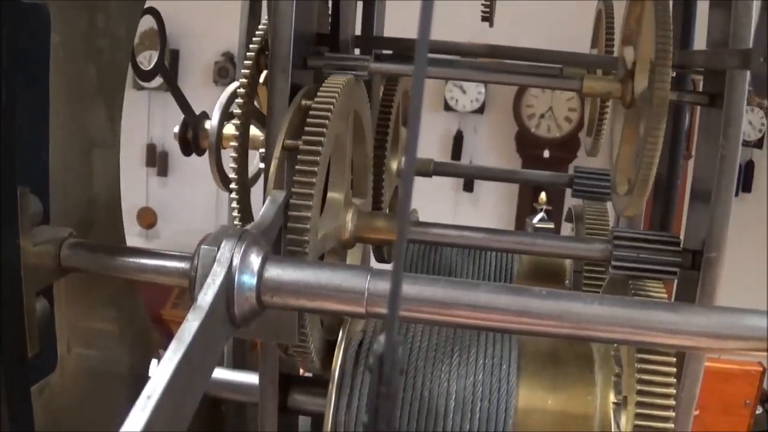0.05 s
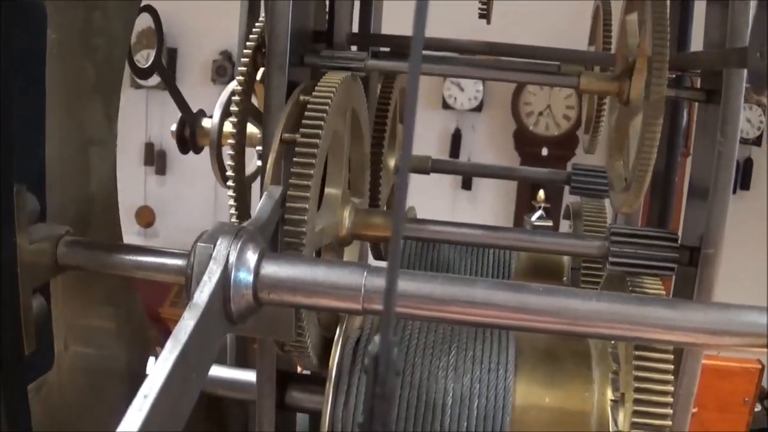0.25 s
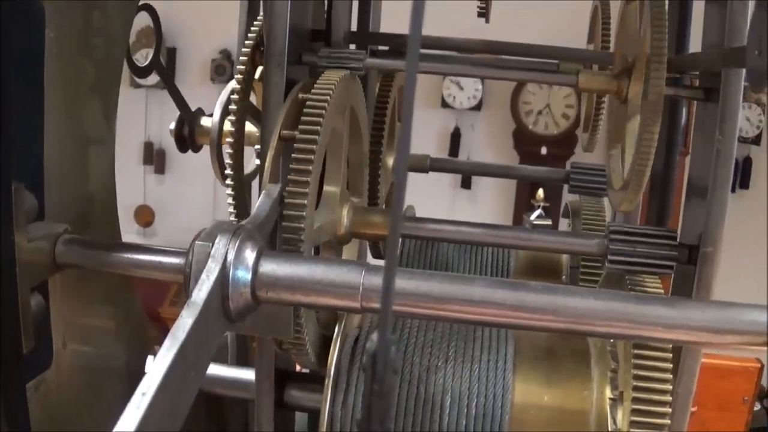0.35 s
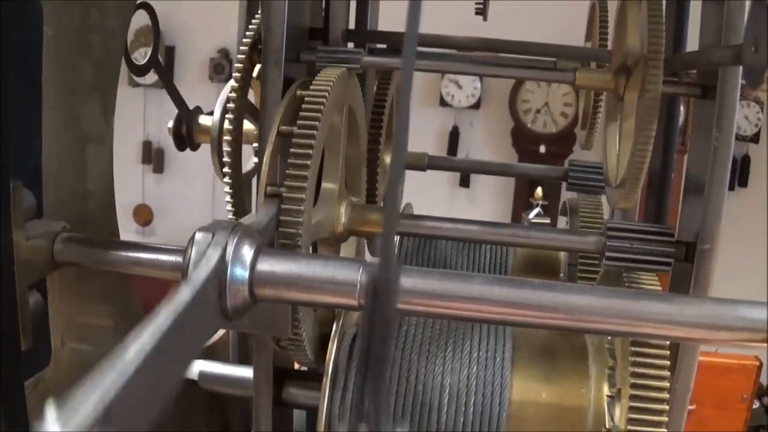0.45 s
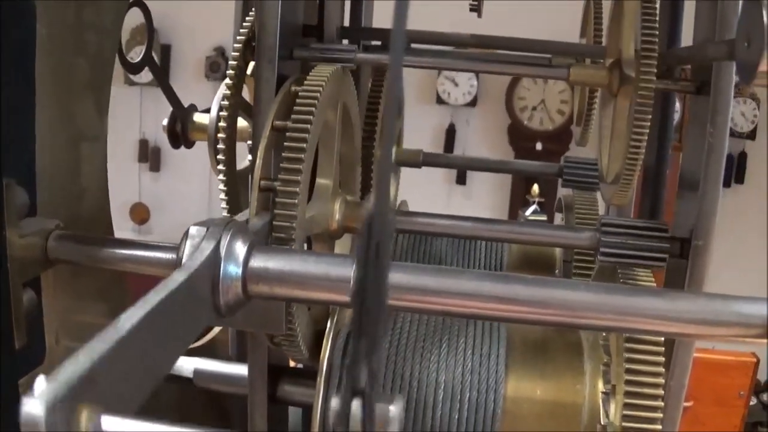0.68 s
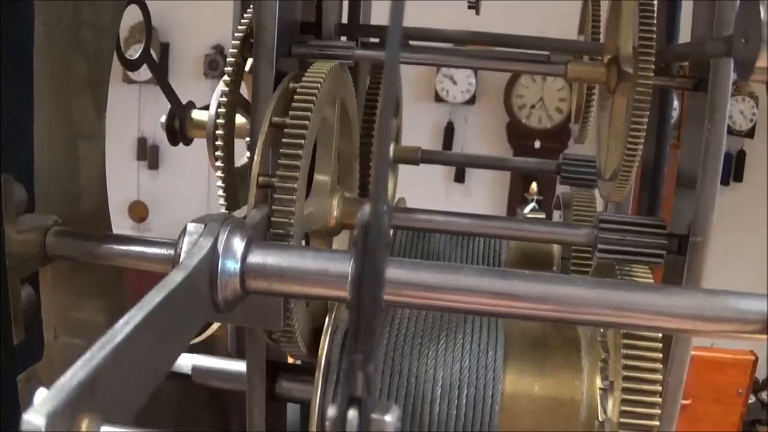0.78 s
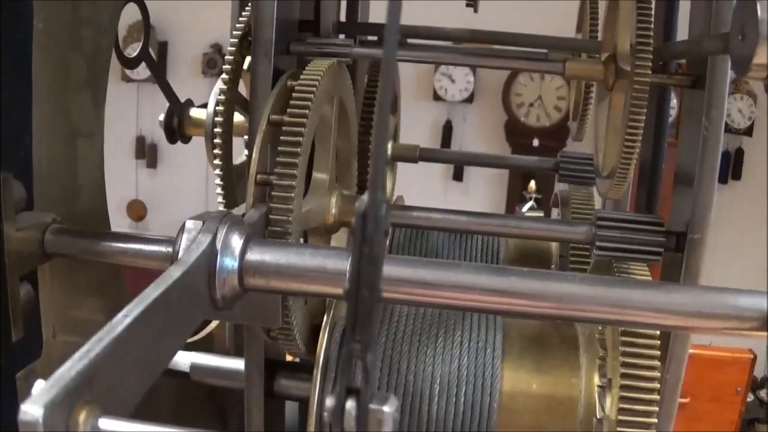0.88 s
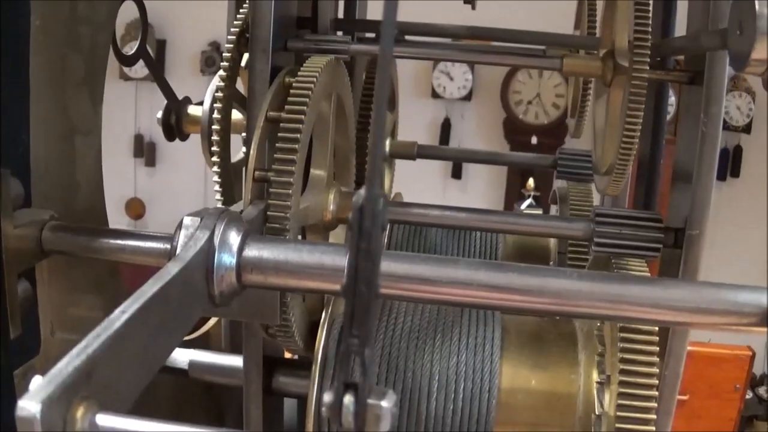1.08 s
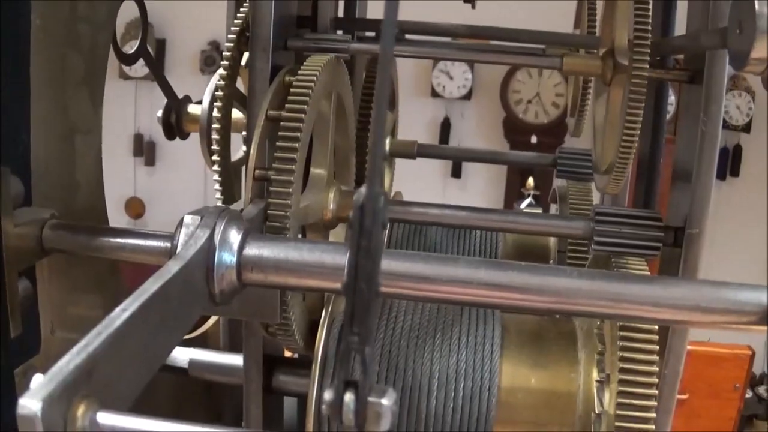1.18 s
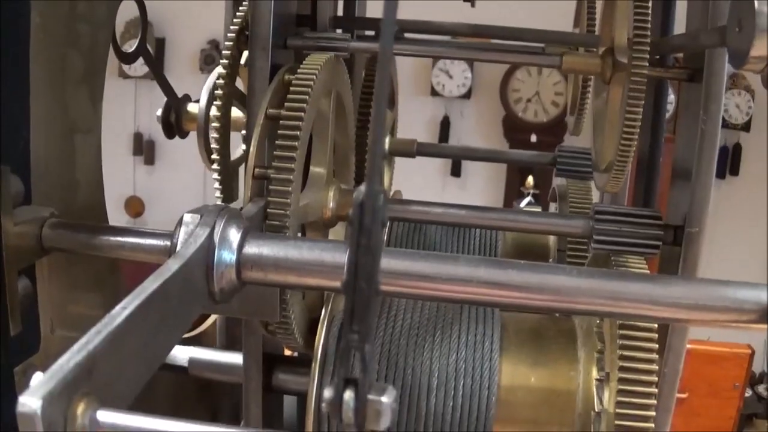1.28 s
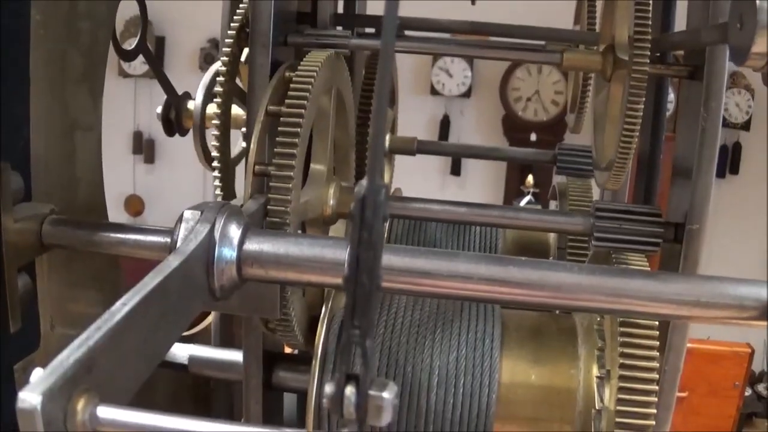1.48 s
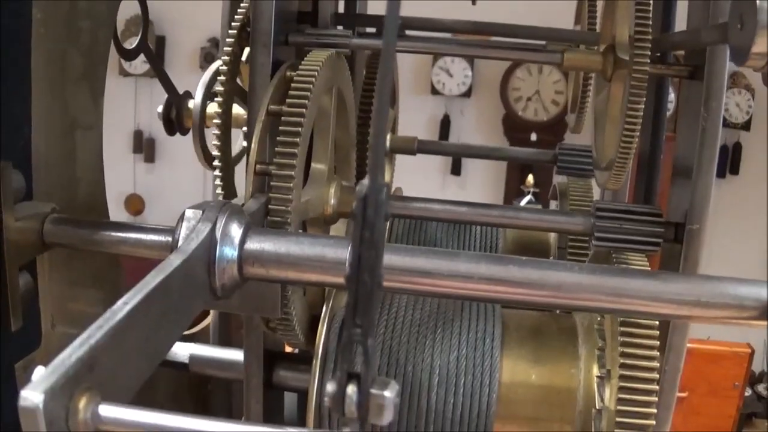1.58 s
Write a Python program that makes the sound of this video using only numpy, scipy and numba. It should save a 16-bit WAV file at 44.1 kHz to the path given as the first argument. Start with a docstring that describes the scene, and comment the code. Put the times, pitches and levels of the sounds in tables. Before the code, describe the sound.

Steel clock levers clunk, then one bell strike rings on over slowing ratchet clicks.

```python
"""In a tower's clock room, beside the movement, the clock strikes once.
Steel levers drop and clatter, their impacts exciting the modes of the frame. The hammer hits a bell
whose paired partials beat, and the train stops; the fly runs on over its ratchet, ever slower.
Air murmurs and wheel teeth tick faintly beneath it all. Gain control flattens the loud blows."""
import sys
import numpy as np
from scipy import signal
from scipy.fft import rfft, irfft, next_fast_len
from scipy.io import wavfile
from scipy.ndimage import uniform_filter1d
from numba import njit

SR = 44100
rng = np.random.default_rng(int(sys.argv[2]) if len(sys.argv) > 2 else 0)


def dump(signal):
    """Clip the signal to [-1, 1] and save it as 16-bit WAV at the path in sys.argv[1]."""
    limited = np.clip(np.atleast_2d(signal).T, -1, 1)
    pcm = np.round(limited * 32767).astype(np.int16)
    wavfile.write(sys.argv[1], SR, pcm)


N = 72765
TOP_HZ = 11050
SIDES = np.array([[1], [-1]])  # left, right

# modes of a heavy part's thud (frequency [Hz], level [dB], T60 [s])
THUD_MODES = [(373, -11.5, 0.18), (420.5, -5.5, 0.26), (458, -10, 0.12), (885, -11, 0.17),
              (1424, 0.5, 0.067), (1480, -0.5, 0.054)]


def undb(db):
    """Decibels to amplitude ratio."""
    return 10 ** (np.asarray(db) / 20)


def fade(t60):
    """Exponential decay: 60 dB in t60 seconds."""
    return np.exp(-np.log(1000) * np.arange(N) / SR / t60)


def rise(tau):
    """Exponential approach to 1, with a time constant of tau seconds."""
    return 1 - np.exp(-np.arange(N) / SR / tau)


def add(out, start, sound):
    """Superposition: a sound joins the mix at its start time."""
    i = max(int(start * SR), 0)
    out[:, i:] += sound[:, :N - i]


def flutter(per_s):
    """Random modulation: ramps between Gaussian values, with a spread near 1."""
    hold = int(SR / per_s)
    return uniform_filter1d(np.repeat(rng.standard_normal(N // hold + 1), hold), hold)[:N]


def noise(spectrum, side_db=-11.5, tilt_db=0, wide_above_hz=3200):
    """Spectral shaping: stereo noise of unit RMS, tilted per octave, the bass alike on both sides."""
    hz, db = np.array(spectrum).T
    size = next_fast_len(N, True)
    bins = np.maximum(np.fft.rfftfreq(size, 1 / SR), 1)
    octave = np.log2(np.clip(bins, hz[0], hz[-1]))
    gain = undb(np.interp(octave, np.log2(hz), db) + tilt_db * octave) * (bins < TOP_HZ)
    mid, side = rfft(rng.standard_normal((2, size))) * gain
    width = undb(side_db) * np.sqrt(np.minimum(bins / wide_above_hz, 1))
    pair = irfft(mid + width * side * SIDES)[:, :N]
    return pair / pair.std()


def ring(modes, scatter_db=2.0, spread_rad=0.17, detune=0.0069):
    """Free vibration: damped modes whose level, pitch and phase vary from blow to blow."""
    t, out = np.arange(N // 2) / SR, np.zeros((2, N))
    for hz, db, t60 in modes:
        size, skew, pitch = rng.standard_normal(3)
        phase = 2 * np.pi * (hz * (1 + detune * pitch) * t + rng.random()) + spread_rad * skew * SIDES
        out[:, :N // 2] += undb(db + scatter_db * size) * fade(t60)[:N // 2] * np.sin(phase)
    return out


def air(level_db=-45.5):
    """Stationary noise: the steady murmur of the room's air."""
    # spectrum of the murmur (frequency [Hz], relative density [dB])
    murmur = [(25, -7), (100, -9.5), (160, -7.5), (250, -12), (420, -7.5), (620, -12.5), (950, -5.5),
              (1800, -11.5), (3000, -17.5), (11000, -37.5)]
    return undb(level_db) * noise(murmur, side_db=-5)


def wheels():
    """Contact transients: teeth of the train tick in faint, decaying bursts of noise."""
    # tooth contacts (time [s], level [dB])
    ticks = [(.008, -40.5), (0.0465, -50.5), (0.0987, -47), (0.151, -45), (0.1892, -41.5), (1.5044, -48.5)]
    # spectrum of a tick (frequency [Hz], relative density [dB])
    tick_spectrum = [(1000, -1.5), (3000, 4.5), (8600, 2), (11000, -6.5)]
    out = np.zeros((2, N))
    for start, db in ticks:
        add(out, start, undb(db) * noise(tick_spectrum) * fade(t60=0.18))
    return out


def ratchet(whirr_from_s=0.712, whirr_to_s=0.81, first_rate_hz=113.5, slowing_per_s=2.6):
    """A slowing impulse train: as the fly runs down, each tooth snaps and rings pawl and wheel."""
    # single clicks after the whirr, the last light and high
    # (time [s], level [dB], relative level of the wheel's ring [dB])
    clicks = [(0.82, -27, 4), (0.83, -24, -0.5), (0.8471, -24.5, 5.5), (.860, -25, 3), (0.875, -23.5, -6),
              (0.892, -19, -5), (0.9155, -24, 1), (0.94, -28, 2.5), (0.963, -27, 4), (0.9959, -24.5, -15),
              (1.0354, -20, -25), (1.1072, -22.5, -26)]
    # spectrum of the pawl's snap (frequency [Hz], relative density [dB])
    snap_spectrum = [(1500, -30), (3400, -13), (6000, -4), (9000, -2), (11000, -11.5)]
    # modes of the pawl (frequency [Hz], level [dB], T60 [s])
    pawl_modes = [(6930, -9.5, 0.11), (8605, 4, 0.06), (9470, -15, 0.096)]
    # modes of the ratchet wheel (frequency [Hz], level [dB], T60 [s])
    wheel_modes = [(3138, -6, 0.067), (3470, -1, 0.055), (3620, -6, 0.068)]
    out, whirr, start = np.zeros((2, N)), [], whirr_from_s
    while start < whirr_to_s:
        whirr.append((start, -26.5, 2.5))  # columns as in clicks
        start += np.exp(slowing_per_s * (start - whirr_from_s)) / first_rate_hz
    for start, db, wheel_db in clicks + whirr:
        ping = ring(pawl_modes, detune=0.0021) + undb(wheel_db) * ring(wheel_modes)
        snap = rise(tau=0.00056) * fade(t60=0.05) * noise(snap_spectrum)
        add(out, start, undb(db) * (snap + rise(tau=0.0023) * ping))
    return out


def impacts(blows, spectrum, frame_db, grain_db=3):
    """Impact excitation: steel chatters on steel in a grainy clash and rings the frame."""
    # modes of the frame (frequency [Hz], level [dB], T60 [s])
    frame_modes = [(171.3, -33.5, 0.86), (260, -24.5, 0.48), (423.6, -28.5, 0.69), (873, -9.5, 0.094),
                   (1894, -10, 0.083), (2558, 0, 0.095), (2703, -2, 0.067), (3200, -1, 0.11),
                   (3383, -5, 0.15), (3930, -13, 0.2), (4310, -1.5, 0.061), (5990, -4, 0.065),
                   (6650, -3, 0.12), (9570, -0.5, 0.12)]
    out = np.zeros((2, N))
    for start, db, tilt_db in blows:
        clash = noise(spectrum, tilt_db=tilt_db) * fade(t60=0.098)
        grain = undb(grain_db * flutter(per_s=1400))
        clash *= grain / np.sqrt(np.mean(grain ** 2))
        add(out, start, undb(db) * rise(tau=0.0014) * (clash + undb(frame_db) * ring(frame_modes)))
    return out


def levers(thud_s=0.449, thud_db=-24.5):
    """Repeated collisions: levers drop and rebound, and a heavy one thuds onto its stop."""
    # blows of the levers on the frame (time [s], level [dB], tilt [dB/octave])
    blows = [(.2305, -11, 1.5), (0.238, -14.5, -1.5), (0.249, -13, -0.5), (.262, -20, -2), (.27, -13, 1),
             (.278, -8, 0.5), (.286, -12.5, 0), (.295, -14.5, -3), (.304, -9, 0), (.314, -7.5, -1),
             (.323, -11.5, -1), (.344, -16, -2), (0.402, -40, 0), (.429, -23, -2.5), (0.4478, -22, 1.5)]
    # spectrum of their clash (frequency [Hz], relative density [dB])
    clash_spectrum = [(60, -56), (250, -20), (600, -13), (850, -3.5), (1300, -5.5), (2000, -5),
                      (2700, -0.5), (4400, 1.5), (7000, 0), (9000, -1.5), (11000, -5.5)]
    out = impacts(blows, clash_spectrum, frame_db=-10.5)
    add(out, thud_s, undb(thud_db) * ring(THUD_MODES, spread_rad=0.05))
    return out


def hammer(relative_thud_db=-18.5):
    """Impact and rebound: the hammer strikes, chatters and falls back, with a clang and thud each time."""
    # contacts of hammer and bell (time [s], level [dB], tilt [dB/octave])
    blows = [(0.5117, -10, 0.5), (.529, -9.5, -3), (0.54, -15.5, 21), (0.547, -12, 5), (.694, -14, -1),
             (.702, -12.5, 1.5), (.718, -26, 16)]
    # spectrum of the clang (frequency [Hz], relative density [dB])
    clang_spectrum = [(100, -42), (250, -16), (600, -18.5), (850, -5), (2000, -4), (4200, -1), (5600, 5.5),
                      (7000, -1.5), (11000, -8)]
    out = impacts(blows, clang_spectrum, frame_db=-14)
    for start, db, _ in blows:
        add(out, start, undb(db + relative_thud_db) * ring(THUD_MODES, spread_rad=0.05))
    return out


def bell(strike_s=0.512, check_s=0.707, check_peak_after_s=0.04, spread_rad=0.27):
    """Beating: each partial swells, wavers and decays while interfering with a slightly sharper twin."""
    # the bell's partials (frequency [Hz])
    partial_hz = [1194.6, 1830.3, 2578.3, 3433.6, 4379.8, 4974, 5431, 5488.6, 5520, 6092, 6569, 7166, 7213,
                  7839, 8324, 8840, 9010, 9475, 9874]
    # how each rings; a positive twin starts in antiphase, a negative one in phase
    # (level [dB], T60 [s], beat rate [Hz], twin amplitude [ratio], swell time constant [s])
    partials = [(-30.5, 9.7, 3.996, 0.44, 0.0072), (-36.5, 30, 2.53, -0.9, 0.28),
                (-32, 6.46, 2.97, 0.29, 0.033), (-14, 3.13, 2.91, 0.24, 0.89),
                (-12, 1.57, 7.7, -0.19, 0.12), (-25, 1.38, 5.9, -0.31, 0.057),
                (-21.5, 1.33, 4.2, -0.14, 0.15), (-15, 1.22, 1.85, 0.42, 0.07),
                (-16.5, 1.02, 4.3, -0.17, 0.0054), (-15, 1.15, 1.3, 0.25, 0.07),
                (-19.5, 1.07, 1.24, 0.9, .05), (-18, 1.03, 2.5, 0.38, 0.028), (-17.5, 1.08, 2, 0.78, 0.064),
                (-17.5, 1.07, 24, 0.44, 0.06), (-19.5, 0.69, 7.7, 0.62, 0.023),
                (-13, 0.77, 4.1, -0.57, 0.036), (-14.5, 0.72, 6.5, 0.017, 0.0046),
                (-16, 0.81, 3.36, 0.44, 0.064), (-17.5, 0.75, 6, -0.18, 0.019)]
    # the wash of countless weak partials (frequency [Hz], relative density [dB])
    wash_spectrum = [(150, -29), (1000, -14), (3500, -7.5), (5000, 0), (6500, 0), (8200, 6), (10000, -6)]
    t, tone, out = np.arange(N) / SR, 0, np.zeros((2, N))
    # falling back, the hammer briefly checks the low partials
    since_check = np.maximum(t + strike_s - check_s, 0) / check_peak_after_s
    check_db = -13.5 * (since_check * np.exp(1 - since_check)) ** 2
    for hz, (db, t60, beat_hz, twin, swell_s) in zip(partial_hz, partials):
        phase = 2 * np.pi * (hz * t + rng.random()) + spread_rad * SIDES * rng.choice([-1, 1])
        twin_phase = phase + 2 * np.pi * beat_hz * t + spread_rad * SIDES
        pair = np.sin(phase) - twin * np.sin(twin_phase)
        waver_db = 2.4 * min(hz / 4400, 1) * flutter(per_s=18)  # deepest from 4400 Hz up
        level_db = db + check_db * (hz < 2200) + waver_db
        tone += undb(level_db) * rise(swell_s) * fade(t60) * pair
    wash = undb(-12.5) * fade(t60=1.0) * noise(wash_spectrum)
    add(out, strike_s, undb([[-1], [0]]) * tone + wash)  # the tone leans slightly right
    return out


def room(dry, wet_db=-11.5, split_hz=1200, low_boost_db=6.5, low_side_db=-16, high_side_db=-7):
    """Reverberation: a diffuse tail in which the lows ring longer than the highs."""
    echoes = rng.standard_normal((2, N))  # mid, side
    low = signal.sosfilt(signal.butter(1, split_hz, fs=SR, output="sos"), echoes)
    high = echoes - low
    tail = undb(low_boost_db) * (low[0] + undb(low_side_db) * SIDES * low[1]) * fade(t60=1)
    tail += (high[0] + undb(high_side_db) * SIDES * high[1]) * fade(t60=0.47)
    tail /= np.sqrt(np.sum(tail ** 2) / 2)
    return dry + undb(wet_db) * signal.fftconvolve(dry, tail, axes=1)[:, :N]


def scene():
    """Superposition of the reverberant movement, the bell and the air."""
    return room(levers() + hammer() + ratchet() + wheels()) + bell() + air()


@njit
def follow(power, attack_s, release_s):
    """Envelope detection: a one-pole smoother with separate time constants for rise and fall."""
    attack, release = 1 / (attack_s * SR), 1 / (release_s * SR)
    out, level = np.empty(len(power)), 1e-9
    for i in range(len(power)):
        level += (power[i] - level) * (attack if power[i] > level else release)
        out[i] = level
    return out


def record(dry, threshold_db=-16, ratio=18, attack_s=0.00096, release_s=0.037, lookahead_s=0.0011):
    """Dynamic compression: gain control holds loud passages down; a steep low-pass cuts the top."""
    power = uniform_filter1d(np.mean(dry ** 2, axis=0), size=128)
    envelope = follow(power, attack_s, release_s)
    ahead = np.interp(np.arange(N) + lookahead_s * SR, np.arange(N), envelope)
    gain = np.minimum(1, undb(threshold_db) / np.sqrt(np.abs(ahead))) ** (1 - 1 / ratio)
    return signal.sosfilt(signal.ellip(12, .2, 80, TOP_HZ, fs=SR, output="sos"), dry * gain)


dry = scene()
out = record(dry)
dump(out)
```